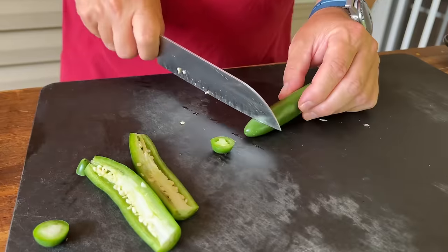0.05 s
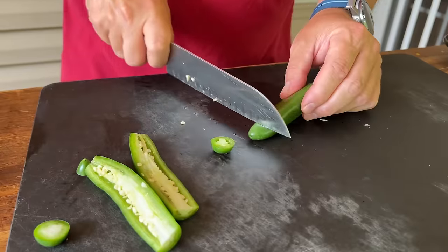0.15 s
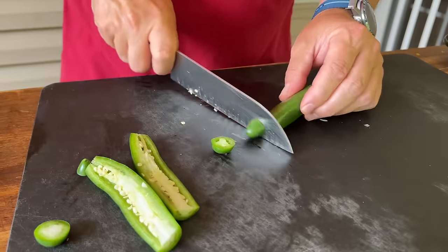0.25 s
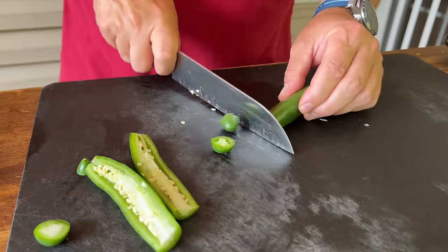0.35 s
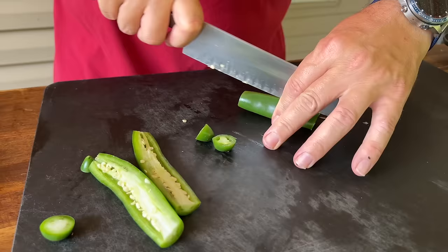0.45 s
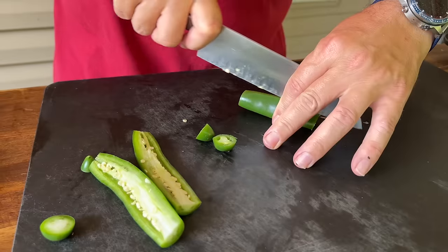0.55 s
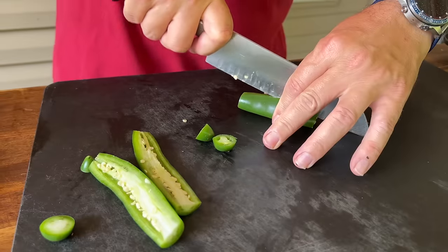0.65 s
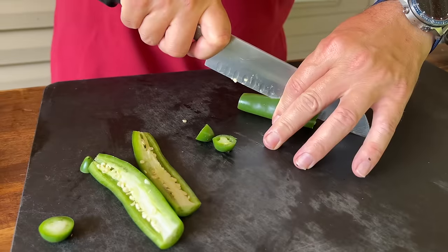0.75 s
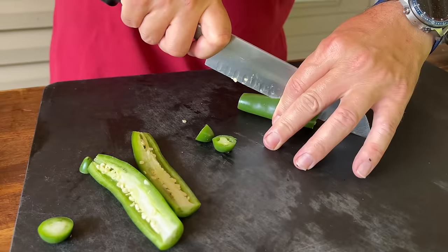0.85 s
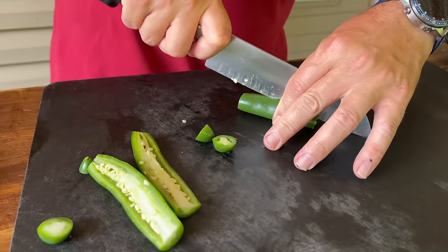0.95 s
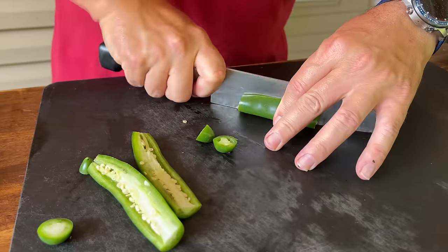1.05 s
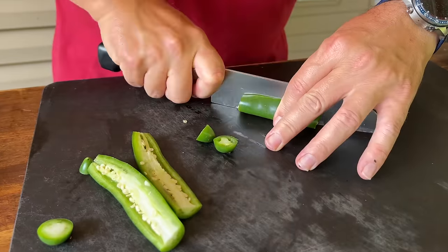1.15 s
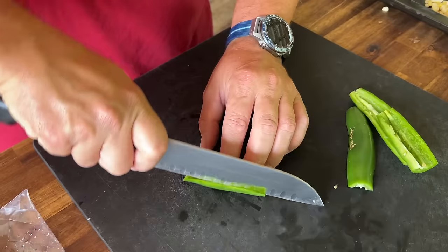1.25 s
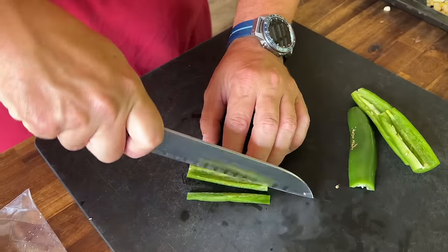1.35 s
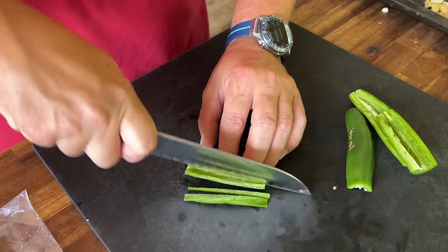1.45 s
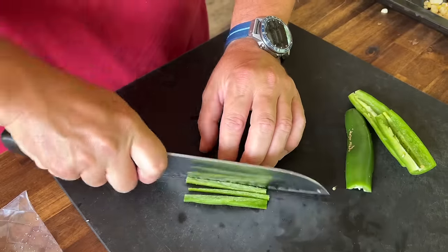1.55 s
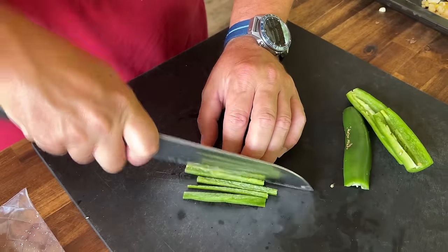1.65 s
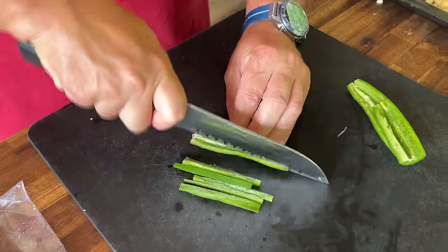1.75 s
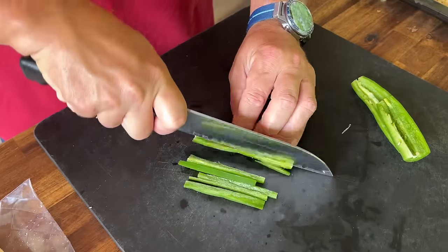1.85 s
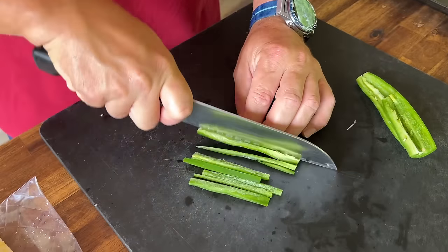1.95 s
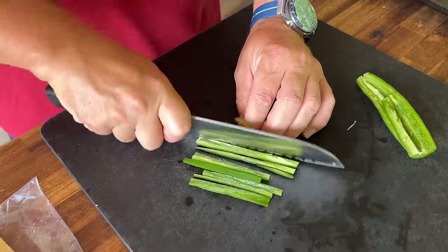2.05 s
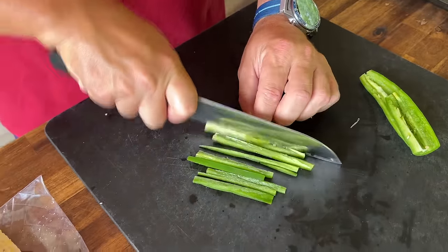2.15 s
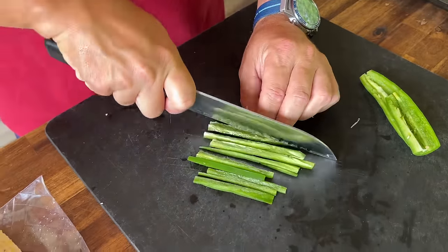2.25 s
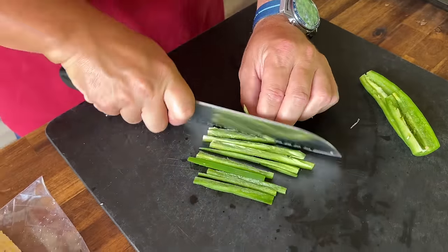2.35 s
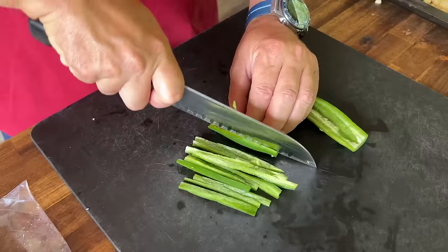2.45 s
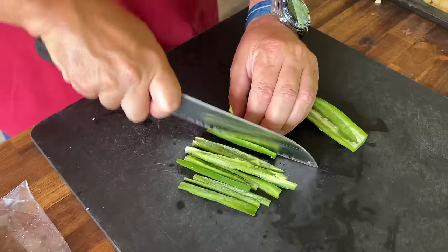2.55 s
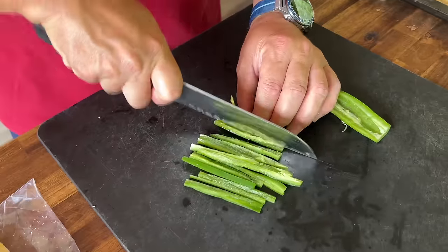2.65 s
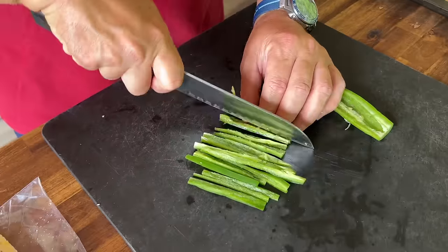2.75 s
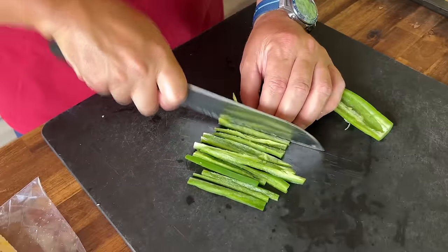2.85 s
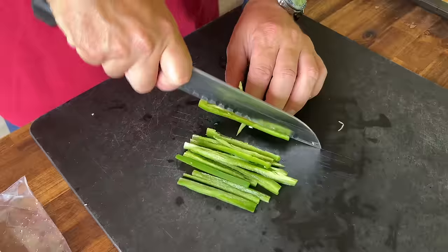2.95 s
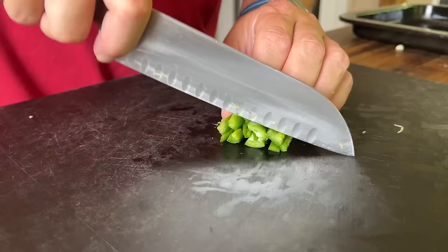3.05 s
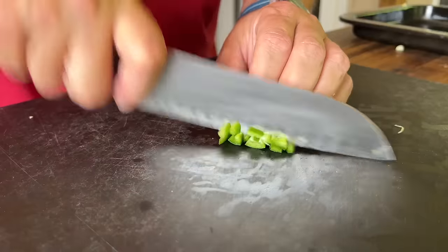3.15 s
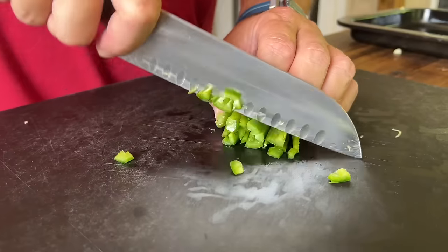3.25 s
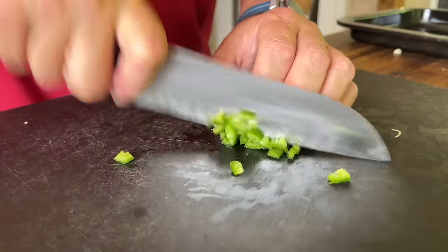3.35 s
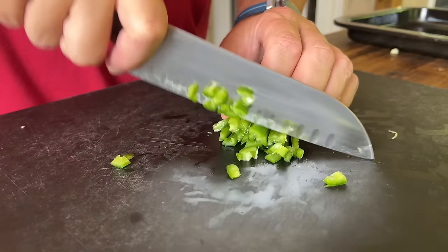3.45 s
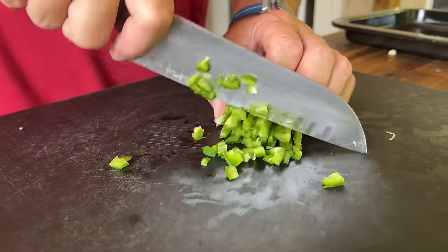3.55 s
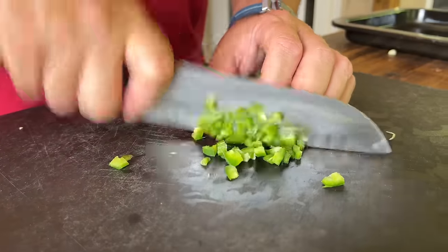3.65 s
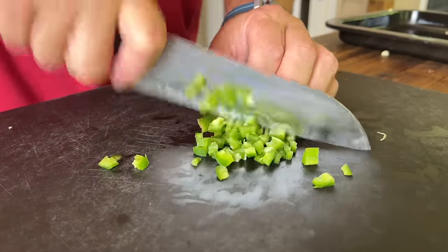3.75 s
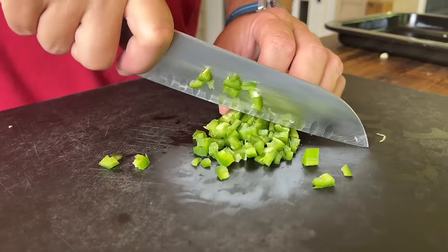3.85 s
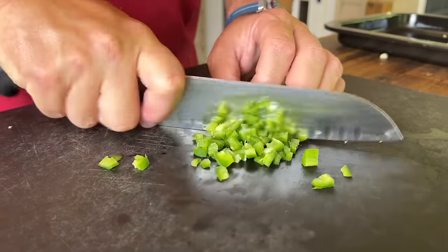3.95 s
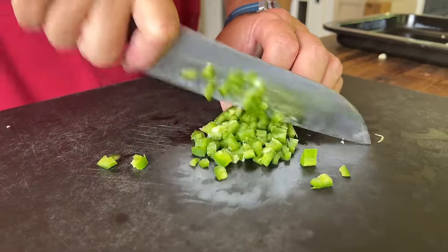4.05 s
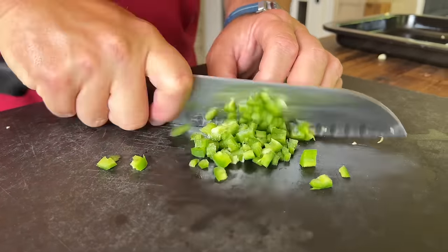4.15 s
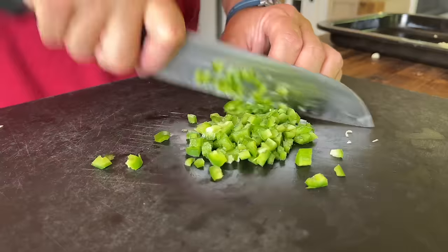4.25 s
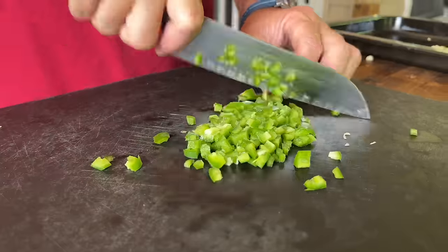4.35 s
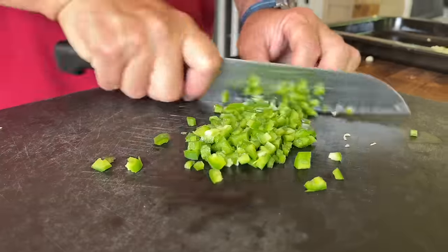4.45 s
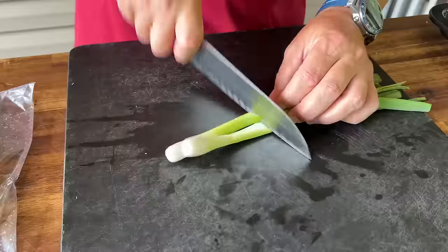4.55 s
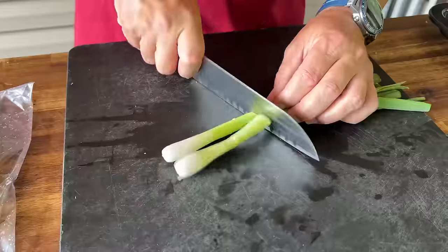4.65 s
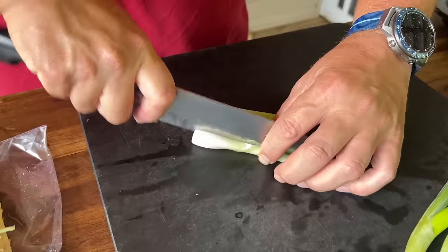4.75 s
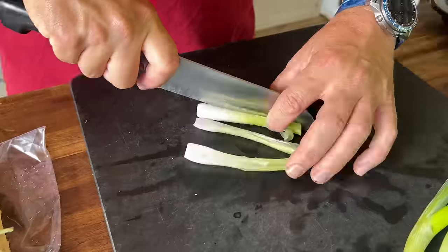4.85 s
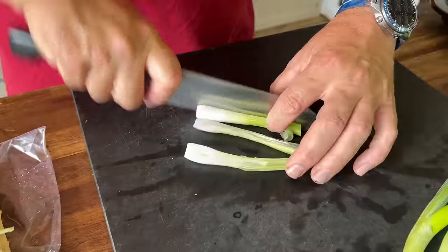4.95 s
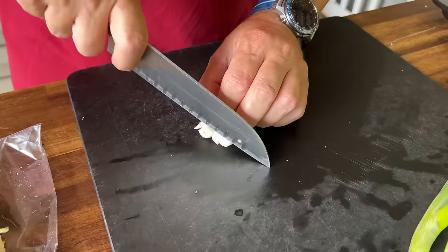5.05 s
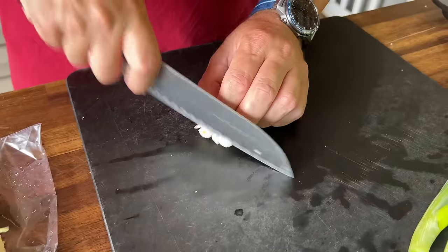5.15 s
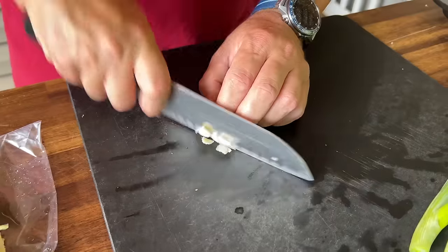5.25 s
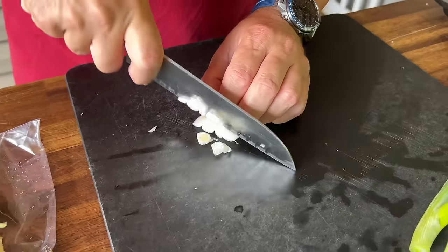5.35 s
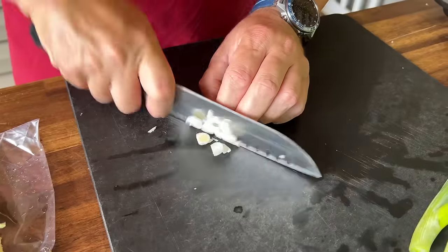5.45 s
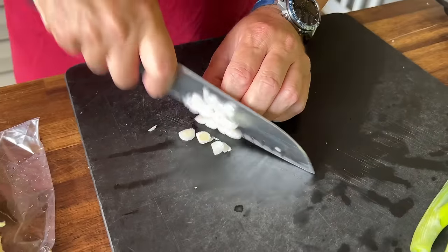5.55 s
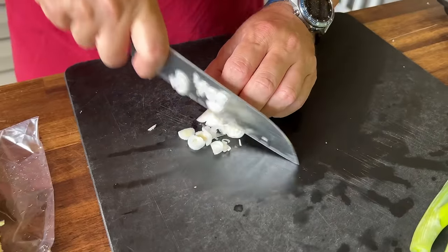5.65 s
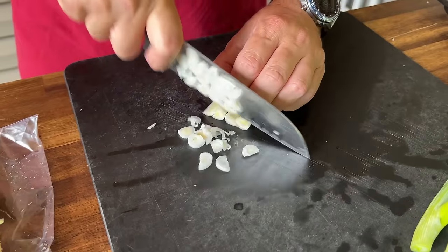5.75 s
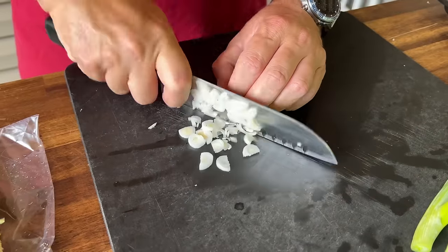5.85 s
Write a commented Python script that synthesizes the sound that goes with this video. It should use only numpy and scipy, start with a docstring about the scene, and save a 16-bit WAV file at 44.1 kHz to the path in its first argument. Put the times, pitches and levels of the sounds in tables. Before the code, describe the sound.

A pepper's skin gives a few small ticks, then a chef's knife chops hard at about 0.25 and 0.6 seconds, clacking on a thin plastic board and ringing briefly in the kitchen. The second chop booms more through the wooden counter. From 1 second, after a short wet rub of the blade, quick slicing begins: swelling, juicy crunches with bright snaps of skin, most ending in a soft knock and low thump. A hollow knife tap comes just after 3 seconds. From 3.2 to 4.5 seconds the dicing is louder and steadier, about seven strokes a second. Lighter cuts through spring onion follow, turning into soft, thin slicing from 5 seconds until nearly 6. The stereo microphone is close to the board. Behind the knife are quiet room air and a thin, high hiss that swells now and then.

```python
"""A pepper's skin ticks, then two hard chops of a chef's knife ring the board and the kitchen.
The stereo camera microphone is close to a thin plastic board on a wooden counter. Quick strokes follow,
through peppers and spring onions: each a swelling crunch of bursting cells, coloured by the food.
Most end in a soft landing, whose bending wave arrives treble first and falls to a low thump.
Behind the knife are quiet room air and a thin high hiss that comes and goes."""
import sys
import numpy as np
from scipy import signal
from scipy.fft import rfft, irfft, next_fast_len
from scipy.io import wavfile
from scipy.ndimage import map_coordinates

SR = 44100
rng = np.random.default_rng(int(sys.argv[2]) if len(sys.argv) > 2 else 0)


def dump_mix(stems):
    """Bounce the given channels to the path in sys.argv[1] as a 16-bit WAV at rate SR."""
    frames = np.atleast_2d(stems).T  # one column per channel
    limited = np.clip(frames, -1, 1)  # hard clip at full scale
    pcm = np.round(limited * 32767).astype(np.int16)
    wavfile.write(sys.argv[1], SR, pcm)


N = 259749

# spectra: frequency_hz, level_db
AIR_SPECTRUM = [(15, -31), (28, -25), (45, 0.5), (150, -1), (260, -2.5), (450, -8), (620, -14.5),
                (950, -11), (1800, -19.5), (3000, -18.5), (5000, -18), (8000, -22), (10000, -61),
                (16000, -52)]  # the quiet kitchen
FLESH_SPECTRUM = [(60, 1.5), (250, -6), (520, -9), (680, -7), (980, 0), (1250, -6.5), (1700, -1),
                  (2600, -6), (3600, -3), (4800, -7), (8000, -2.5), (11000, -7), (15500, -0.5)]  # bursting cells
THUMP_SPECTRUM = [(15, -20), (35, -26), (47, -2), (62, 5), (80, 2.5), (100, -2.5), (130, -15), (200, -28.5),
                  (400, -65)]  # the counter under a soft landing
KNOCK_SPECTRUM = [(70, -21), (130, 2.5), (175, 3), (225, -17), (320, 0.5), (400, -8.5), (550, -5.5),
                  (720, -14.5), (1000, -7), (1500, -16.5), (3000, -29), (8000, -61)]  # the board under a soft landing
CLACK_SPECTRUM = [(40, 1), (130, 8.5), (300, -0.5), (500, -4), (750, -2), (1200, -5.5), (2000, 1),
                  (2900, -12.5), (3900, -3.5), (5000, -15), (5900, -13), (7000, -25), (15000, -17)]  # the clatter of a hard chop
CRACK_SPECTRUM = [(200, 1), (1000, -34), (2000, 15), (4000, -3), (7500, 2), (15000, -23)]  # the edge hitting the board
BOOM_SPECTRUM = [(15, -61), (45, -41), (130, 3), (280, -4), (500, -16), (900, -13.5), (3000, -60)]
TICK_SPECTRUM = [(1500, -47), (3500, 13), (8000, 16), (15000, 16)]
SNAP_BODY_SPECTRUM = [(100, 0), (900, -5.5), (2200, -4), (4500, -10), (9000, -42)]
SCATTER_SPECTRUM = [(60, -14), (300, -5), (1000, 1), (4500, 3), (9000, -1), (15000, -1)]
KITCHEN_SPECTRUM = [(70, -15.5), (280, -4), (1000, -0.5), (2200, 0.5), (6000, 4.5), (14000, -10.5)]
# decay times: frequency_hz, t60_s
CLACK_DECAY = [(80, 0.13), (300, 0.12), (1000, 0.15), (2000, 0.1), (5000, 0.079), (14000, 0.024)]
KITCHEN_DECAY = [(80, 0.17), (280, 0.94), (700, 0.55), (2000, 0.3), (5000, 0.33), (14000, 0.2)]
SCATTER_DECAY = [(100, 0.05), (2000, 0.045), (10000, 0.025)]
# modes: pitch_hz, level_db, t60_s
TAP_MODES = [(556, -1, 0.0084), (864, 0.5, 0.013), (996, 0.5, 0.025), (1290, -4.5, 0.015),
             (1590, 5, 0.0089)]  # a hollow knock of the knife
CHOP_MODES = [(111.7, -25.5, 0.54), (174, -10, 0.15), (300, -13.5, 0.55), (438.6, -9, 0.28),
              (474, -1, 0.12), (903, -2, 0.23), (1022, -1.5, 0.13), (1334, 4, 0.062), (1580, -0.5, 0.042),
              (1790, 12, 0.086), (1980, 7.5, 0.057), (2120, -15, 0.14), (2252, 9.5, 0.079),
              (2210, -15.5, 0.055), (3880, -15.5, 0.078), (4550, -54, .11), (5270, -27, .13),
              (5320, -10, 0.084)]  # board and blade after a hard chop
HELD_BOARD_MODES = [(820, 2.5, 0.09), (881, -8, 0.39), (1014, -3, .12), (1436, -8, 0.044),
                    (1480, -5.5, 0.16), (1510, -3, 0.47)]  # the board under the hand
# left microphone port against right: frequency_hz, lead_rad
PORT_LEAD = [(20, 0), (1400, .25), (3600, 1.2), (5000, 1.1), (6900, 0), (8300, -1.1), (10100, -3.1),
             (13500, -6.3), (15800, -8.4)]
# left port against right: frequency_hz, level_db
PORT_BALANCE = [(60, 1), (200, 1.2), (480, 1.8), (1300, -1.5), (2400, 2), (4400, 6), (8000, 2), (11000, 0)]
# swells of the hiss: start_s, length_s, level_db
HISS_SWELLS = [(1.393, 0.2, -45.5), (2.434, 0.5, -46), (3.317, 0.29, -49), (4.229, 0.083, -47)]
# brief dips of the whole sound: start_s, recovery_s
DIPS = [(1.624, 0.022), (3.454, 0.022), (3.593, 0.029), (3.723, 0.018), (3.858, 0.062), (5.027, 0.047),
        (5.663, 0.025)]
# the flat of the blade slides along flesh or knuckles: start_s, length_s, level_db
BLADE_RUBS = [(0.98, 0.087, -37), (3.127, 0.042, -50), (5.118, 0.13, -52.5), (5.423, 0.335, -57.5)]
# a hollow tap of the knife: start_s, level_db
KNIFE_TAPS = [(3.0645, -16)]
# the skin snaps or the edge ticks on the board: start_s, level_db
SKIN_SNAPS = [(0.0616, -26), (0.086, -29.5), (0.1127, -25.5), (0.1318, -22), (0.1588, -24), (0.5794, -31),
              (0.5891, -28), (1.0416, -27), (1.057, -10.5), (1.2217, -27), (1.3035, -22), (1.33, -21),
              (1.4557, -24.5), (1.5354, -9.5), (1.6594, -18.5), (1.882, -24.5), (1.9394, -21.5),
              (2.0292, -5.5), (2.6196, -10.5), (2.8659, -21), (2.8875, -14.5), (3.0288, -21.5),
              (3.489, -23.5), (3.5258, -14.5), (3.6148, -24), (3.641, -23.5), (3.7426, -23),
              (3.7863, -20.5), (4.0346, -32.5), (4.134, -12.5), (4.2573, -17), (4.2823, -20.5),
              (4.4153, -26.5), (4.5724, -18.5), (4.767, -25.5)]
# hard chops right through a pepper: start_s, level_db, crack_db, boom_db
HARD_CHOPS = [(0.2521, -14.5, -2.5, -13), (0.62, -16, -7, 4.5)]
# knife strokes: through_s, length_s, crunch_db, landing_db, pitch_hz (None: stops short of the board)
STROKES = [(0.203, 0.086, -45.5, None, None), (0.633, 0.17, -54.5, None, None),
           (1.058, 0.062, -32.5, -27, 485), (1.271, 0.057, -42, None, None),
           (1.376, 0.12, -39.5, None, None), (1.473, 0.029, -32.5, None, None),
           (1.532, 0.021, -33, -25.5, 313), (1.699, 0.034, -31, -34.5, 556),
           (1.833, 0.052, -34.5, -30, 398), (1.961, 0.038, -30.5, None, None),
           (2.027, 0.036, -28, -22.5, 266), (2.191, 0.046, -30.5, -26, 380), (2.336, .025, -33, -29, 300),
           (2.614, 0.16, -36.5, -41, 390), (2.72, 0.033, -29.5, -23, 407), (2.884, 0.033, -37, -23, 490),
           (3.062, 0.078, -38, None, None), (3.194, .11, -28.5, -22.5, 322), (3.395, .075, -24, -20.5, 230),
           (3.531, 0.058, -24.5, -15.5, 503), (3.677, 0.074, -23.5, -19.5, 327),
           (3.808, 0.06, -23, -18, 453), (3.947, 0.11, -27.5, -15, 520), (4.133, 0.09, -26.5, -17.5, 505),
           (4.298, .06, -23.5, -21, 396), (4.429, 0.045, -24, -15, 580), (4.607, 0.059, -33, -30, 385),
           (4.838, 0.11, -34, None, None), (4.994, 0.076, -35, -40, 354), (5.281, .17, -41.5, -27.5, 387),
           (5.467, 0.063, -37, -34.5, 191), (5.608, 0.051, -37.5, -22.5, 328),
           (5.744, 0.086, -39.5, None, None), (5.84, 0.043, -36, -23.5, 250)]
# under the knife in turn: whole pepper, strips, dice, spring onion, thin white slices
FOOD_COLUMNS = ("start_s", "swell_db", "treble_db", "board_db", "rub_db", "hollow_db", "snap_body_db")
FOODS = [(0, 11, -2, 0, 1.5, 1, -7), (1.2, 15.5, 1.5, -1, 0, 5.5, -9.5), (3.1, 29, -5, -5.5, 0, -6.5, -1.5),
         (4.5, 9.5, 1, -1, 0.5, -3.5, 0), (5.05, 15, 2, 2, 1.5, -1.5, -13)]


def amp(db):
    """Decibels to gain."""
    return 10 ** (np.asarray(db) / 20)


def unit(x):
    """Scale to rms 1."""
    return x / np.sqrt(np.mean(x ** 2) + 1e-20)


def along(points, hz):
    """Read (frequency_hz, value) points on a log axis."""
    frequencies, values = np.transpose(points)
    return np.interp(np.log(hz + 1), np.log(frequencies + 1), values)


def peak(hz, centre_hz, width_hz):
    """A bell of height 1 around a resonance."""
    return 1 / (1 + (2 * (hz - centre_hz) / width_hz) ** 2)


def ripple(hz, count):
    """A random ripple over frequency, finest in the bass."""
    return np.interp(np.sqrt(hz), np.linspace(0, np.sqrt(SR / 2), count), rng.standard_normal(count))


def wobble(rate):
    """A smooth random curve, rate knots a second."""
    return map_coordinates(rng.standard_normal(int(N * rate / SR) + 4), [np.arange(N) * rate / SR])


def filtered(x, response):
    """Pass x through a complex response of frequency."""
    length = x.shape[-1]
    size = next_fast_len(length + SR // 4)
    return irfft(rfft(x, size) * response(np.fft.rfftfreq(size, 1 / SR)), size)[..., :length]


def coloured(x, spectrum, size=4096):
    """Pass x through a minimum-phase filter of unit energy, shaped like the spectrum."""
    cepstrum = irfft(np.log(amp(along(spectrum, np.fft.rfftfreq(size, 1 / SR)))))
    cepstrum[1:size // 2] *= 2
    cepstrum[size // 2 + 1:] = 0
    response = irfft(np.exp(rfft(cepstrum)))
    return signal.fftconvolve(x, response / np.linalg.norm(response))[:len(x)]


def dying_noise(decay):
    """Half a second of noise in which each frequency dies at its own speed."""
    hz, t, bands = signal.stft(rng.standard_normal(SR // 2), SR, nperseg=256)
    fade = amp(-60 * t / along(decay, hz)[:, None])
    return signal.istft(bands * fade, SR, nperseg=256)[1][:SR // 2]


def ring(modes, t):
    """Damped modes, struck with slightly random strengths and random signs."""
    return sum(rng.choice([-1, 1]) * amp(db + rng.normal() - 60 * t / t60) * np.sin(2 * np.pi * hz * t)
               for hz, db, t60 in modes)


def bending_wave(spectrum, spread, pitch_hz, lift_db=5):
    """A push on the board, peak 1: bending waves take spread / sqrt(hz) seconds, so bass comes last."""
    hz = np.fft.rfftfreq(SR // 2, 1 / SR)
    strength = amp(along(spectrum, hz) + lift_db * peak(hz, pitch_hz, pitch_hz / 2))
    travel = np.exp(-4j * np.pi * spread * np.sqrt(hz))
    wave = irfft(strength * travel)[:SR // 4]
    return wave / abs(wave).max()


def add(track, start_s, sound):
    """Mix a sound into the track."""
    start = max(round(start_s * SR), 0)
    track[start:start + len(sound)] += sound[:max(N - start, 0)]


def food_at(time_s):
    """The food under the knife at this time."""
    return [dict(zip(FOOD_COLUMNS, row)) for row in FOODS if row[0] <= time_s][-1]


def room_air(level_db=-58):
    """Quiet kitchen air, much alike at both microphone ports."""
    shared = coloured(rng.standard_normal(N), AIR_SPECTRUM)
    separate = np.array([coloured(rng.standard_normal(N), AIR_SPECTRUM) for _ in range(2)])
    return unit(shared + 0.38 * separate) * amp(level_db + 1.4 * wobble(2.4))


def hiss(centre_hz=5400, width_hz=1300, floor_db=-59.5, trim_db=-2, fade_s=0.036):
    """A thin fluttering hiss in the background that swells now and then."""
    band = filtered(rng.standard_normal((2, N)), lambda hz: peak(hz, centre_hz, width_hz))
    t, level = np.arange(N) / SR, amp(floor_db)
    for start_s, length_s, level_db in HISS_SWELLS:
        swell = np.interp(t - start_s, [-fade_s, 0, length_s, length_s + fade_s], [0, 1, 1, 0])
        level = np.maximum(level, amp(level_db) * swell)
    return unit(band) * level * amp(trim_db + 1.36 * wobble(120))


def reflections(x, decay, spectrum, delay_s):
    """Diffuse sound off the surroundings, unrelated at the two ports."""
    tails = [coloured(dying_noise(decay), spectrum) for _ in range(2)]
    late = np.pad(x, (round(delay_s * SR), 0))
    return np.array([signal.fftconvolve(late, tail / np.linalg.norm(tail))[:N] for tail in tails])


def microphone_ports(x):
    """The two ports hear the nearby board with different phase and level."""
    def response(hz):
        left = amp(along(PORT_BALANCE, hz) / 2) * np.exp(0.5j * along(PORT_LEAD, hz))
        return np.array([left, 1 / left])
    return filtered(x, response)


def level_dips(depth_db=-13, fall_s=0.0024):
    """A gain that drops abruptly between some strokes and creeps back."""
    t = np.arange(N) / SR
    return amp(sum(np.interp(t - start_s, [-fall_s, 0, recovery_s], [0, depth_db, 0])
                   for start_s, recovery_s in DIPS))


def blade_rubs(blade_hz=1830, width_hz=750, swell_db=10, fade_s=0.015):
    """Wet friction sings in one broad resonance of the blade, louder as it bears down."""
    t, pressure = np.arange(N) / SR, np.zeros(N)
    flutter = amp(2 * wobble(45))
    rasp = filtered(rng.standard_normal(N), lambda hz: peak(hz, blade_hz, width_hz))
    for start_s, length_s, level_db in BLADE_RUBS:
        knots_s = [-fade_s, 0, length_s, length_s + fade_s]
        pressure += amp(level_db) * np.interp(t - start_s, knots_s, [0, amp(-swell_db), 1, 0])
    return unit(rasp * flutter) * pressure


def knife_taps(attack_s=0.00127):
    """A short hollow knock, damped by the hand."""
    track, t = np.zeros(N), np.arange(SR // 8) / SR
    knock = sum(amp(db - 60 * t / t60) * np.sin(2 * np.pi * hz * t) for hz, db, t60 in TAP_MODES)
    knock *= 1 - np.exp(-t / attack_s)
    for start_s, level_db in KNIFE_TAPS:
        add(track, start_s, amp(level_db) * knock / abs(knock).max())
    return track


def snaps(t60_s=0.012, tick_db=-8, body_db=-6, fibre_db=6, scatter_db=3):
    """Skin breaks with a bright tick over a duller body; three fibres give way within each stroke."""
    track, t = np.zeros(N), np.arange(SR // 16) / SR
    fibres = []
    for through_s, length_s, crunch_db, _, _ in STROKES:
        for early in rng.random(size=3):  # the earlier in the stroke, the softer
            level_db = crunch_db + fibre_db - early * food_at(through_s)["swell_db"]
            fibres.append((through_s - early * length_s, level_db + scatter_db * rng.uniform(-1.08, 1)))
    for start_s, level_db in fibres + SKIN_SNAPS:
        tick, body = rng.standard_normal((2, len(t))) * amp(level_db - 60 * t / t60_s)
        tick = amp(tick_db) * coloured(tick, TICK_SPECTRUM)
        body = amp(body_db + food_at(start_s)["snap_body_db"]) * coloured(body, SNAP_BODY_SPECTRUM)
        add(track, start_s, tick + body)
    return track


def landings(firm_db=-19.5, knock_db=-29, ring_db=-41, thump_db=-2, rattle_t60_s=0.05, hand_t60_s=0.18,
             settle_s=0.0103, rebound_s=0.033, rebound_db=-13, hold_s=0.05, damp_s=0.027):
    """The edge lands: a falling knock, the board's rattle, a hollow ring and a thump of the counter."""
    track, t = np.zeros(N), np.arange(SR // 4) / SR
    pressed = np.interp(t, [hold_s, hold_s + damp_s], [1, 0])  # the resting blade stills the board
    for through_s, _, _, landing_db, pitch_hz in STROKES:
        if landing_db is None:
            continue
        force_db = landing_db - firm_db
        knock = bending_wave(KNOCK_SPECTRUM, spread=0.28, pitch_hz=pitch_hz)
        paths = rng.standard_normal(len(t)) * amp(-60 * t / rattle_t60_s)
        rattle = signal.fftconvolve(knock, paths / np.linalg.norm(paths))[:len(t)]
        knock_gain = amp(knock_db + 1.55 * force_db)  # a harder landing is more knock than thump
        add(track, through_s, knock_gain * pressed * (knock + amp(1) * rattle))

        grip = 1 + 0.04 * rng.normal()  # the hand detunes the board a little each time
        hollow_db = ring_db + food_at(through_s)["hollow_db"] + 0.21 * force_db
        hollow = amp(hollow_db - 60 * t / hand_t60_s) * ring(HELD_BOARD_MODES, grip * t)
        add(track, through_s + 0.003956, pressed * hollow)

        # the stiff counter spreads a push less than the thin board, and no two spots answer alike
        thump = bending_wave(THUMP_SPECTRUM, spread=0.225, pitch_hz=pitch_hz)
        thump = amp(landing_db + thump_db) * filtered(thump, lambda hz: amp(2 * ripple(hz, count=90)))
        rock_back = np.interp(t - rebound_s * rng.uniform(0.73, 1.14), t, thump, left=0)
        add(track, through_s + settle_s, pressed * (thump + amp(rebound_db) * rock_back))
    return track


def crunch(clumps_per_s=2400, juice_db=-4, onset_s=0.06, release_s=0.064, split_hz=4000,
           body_db=-5.5, treble_db=-1, board_hz=920, rub_hz=1900):
    """Cells burst in clumps, louder as the blade presses deeper, and die away once it is through."""
    t, track = np.arange(N) / SR, np.zeros(N)
    sizes = amp(4 * np.minimum(rng.exponential(size=N), 3)) * rng.choice([-1, 1], N)
    clumps = unit(sizes * (rng.random(N) < clumps_per_s / SR))
    juice = amp(juice_db) * rng.standard_normal(N)
    flicker = amp(2.2 * np.minimum(wobble(280), 1.8) + 1.5 * wobble(110))
    grain = coloured((clumps + juice) * flicker, FLESH_SPECTRUM)
    lows = filtered(grain, lambda hz: 1 / (1 + (hz / split_hz) ** 4))
    body, treble = amp(body_db) * unit(lows), amp(treble_db) * unit(grain - lows)
    for through_s, length_s, crunch_db, _, _ in STROKES:
        food = food_at(through_s)
        knots_s = through_s + np.array([-length_s - onset_s, -length_s, 0, release_s])
        span = slice(max(round(knots_s[0] * SR), 0), round(knots_s[-1] * SR))
        pressure_db = np.interp(t[span], knots_s, [-food["swell_db"] - 53, -food["swell_db"], 0, -57])
        stroke = amp(crunch_db + pressure_db) * (body[span] + amp(food["treble_db"]) * treble[span])

        def colour(hz):
            """Each slice wakes board and blade in its own way."""
            board_db = food["board_db"] * peak(hz, board_hz, width_hz=680)
            blade_db = food["rub_db"] * peak(hz, rub_hz, width_hz=1080)
            return amp(board_db + blade_db + 2 * ripple(hz, count=70))
        add(track, knots_s[0], filtered(stroke, colour))
    return track


def hard_chops(ring_db=-9, clack_db=-1, crack_t60_s=0.011, split_s=0.0095, split_db=-12):
    """The pepper splits, then the edge hits the board: a crack, a clatter and a boom of the counter."""
    track, t = np.zeros(N), np.arange(SR // 2) / SR
    boom = amp(-3) * bending_wave(BOOM_SPECTRUM, spread=0.137, pitch_hz=520, lift_db=10)
    for start_s, level_db, crack_db, boom_db in HARD_CHOPS:
        impact = 4 * (t == 0) + rng.standard_normal(len(t)) * amp(-60 * t / crack_t60_s)
        crack = amp(crack_db + 6) * coloured(impact, CRACK_SPECTRUM)
        clack = amp(clack_db) * coloured(dying_noise(CLACK_DECAY), CLACK_SPECTRUM)
        ringing = amp(ring_db) * ring(CHOP_MODES, t)
        add(track, start_s, amp(level_db) * (crack + clack + ringing))
        add(track, start_s, amp(level_db + boom_db) * boom)
        split = coloured(rng.standard_normal(len(t)) * (t < split_s), CLACK_SPECTRUM)
        add(track, start_s - split_s, amp(level_db + split_db) * split)
    return track


def scene(scatter_db=-7.5):
    """The board up close, scatter off hands and counter, and the kitchen, which the chops wake most."""
    slicing = crunch() + blade_rubs() + snaps() + landings() + knife_taps()
    chops = hard_chops()
    direct = slicing + chops
    scatter = reflections(direct, SCATTER_DECAY, SCATTER_SPECTRUM, delay_s=0.0005)
    into_kitchen = amp(-16.5) * slicing + amp(-14) * chops
    kitchen = reflections(into_kitchen, KITCHEN_DECAY, KITCHEN_SPECTRUM, delay_s=0.008)
    background = room_air() + hiss()
    return level_dips() * (microphone_ports(direct) + amp(scatter_db) * scatter + kitchen + background)


def record(dry):
    """The camera clips at full scale and keeps nothing above its band limit."""
    limit_hz = 15900
    return filtered(np.clip(dry, -1, 1), lambda hz: 1 / (1 + (hz / limit_hz) ** 150))


dry = scene()
out = record(dry)
dump_mix(out)
```